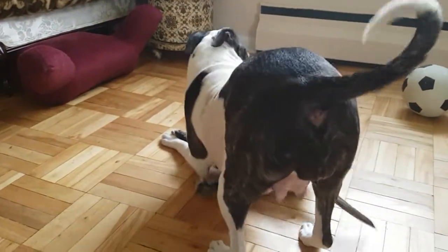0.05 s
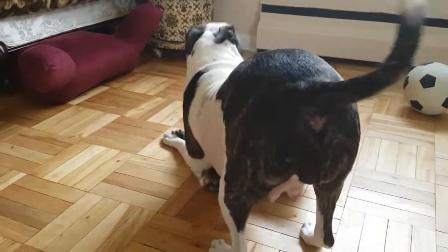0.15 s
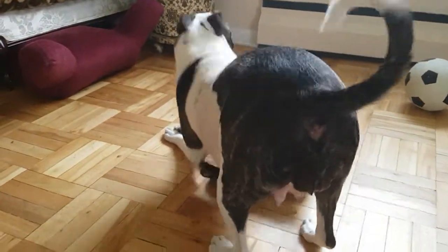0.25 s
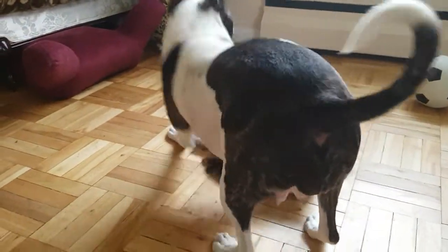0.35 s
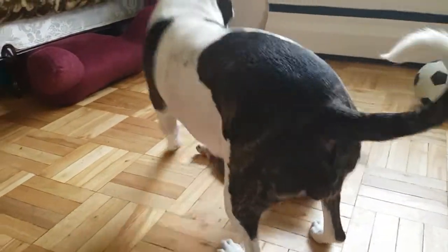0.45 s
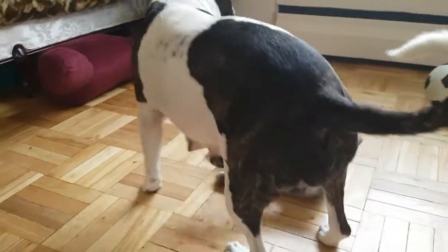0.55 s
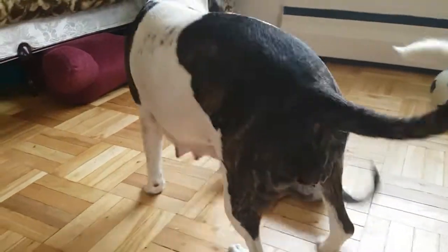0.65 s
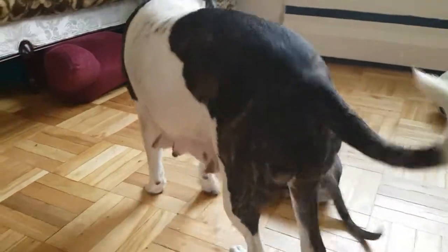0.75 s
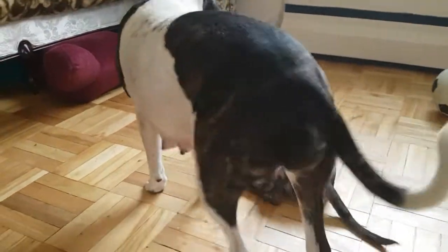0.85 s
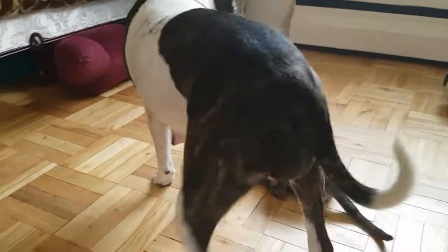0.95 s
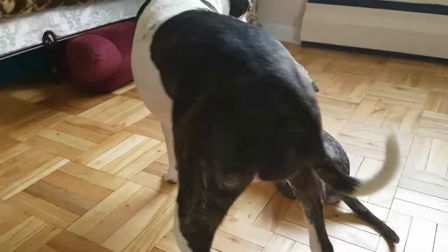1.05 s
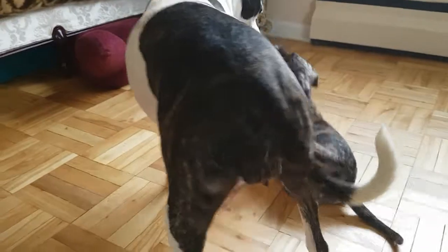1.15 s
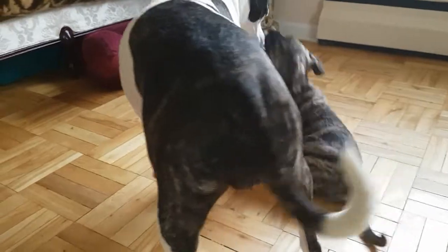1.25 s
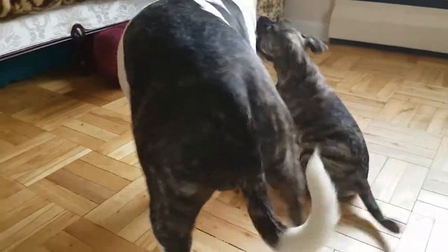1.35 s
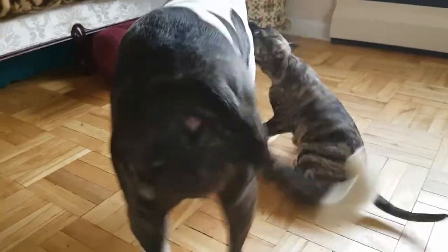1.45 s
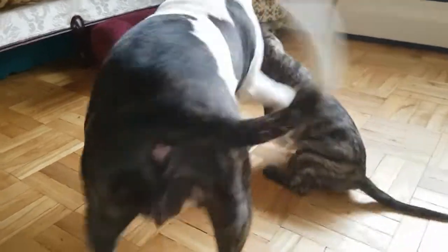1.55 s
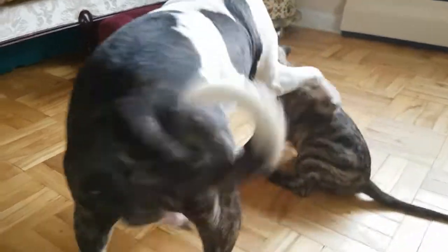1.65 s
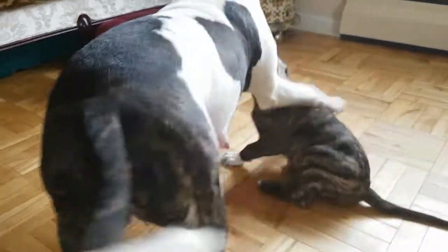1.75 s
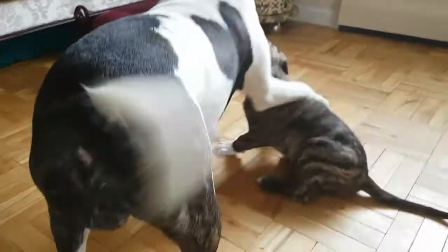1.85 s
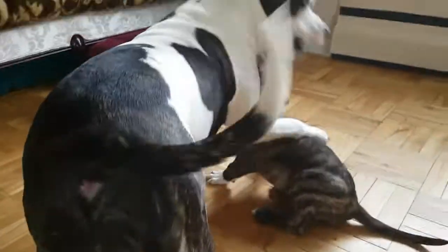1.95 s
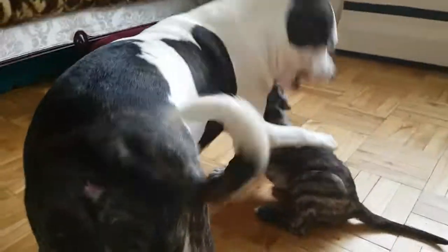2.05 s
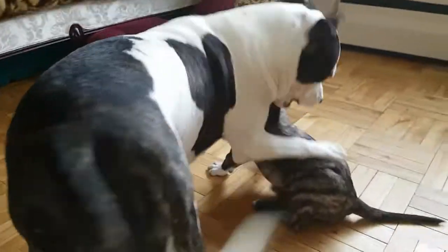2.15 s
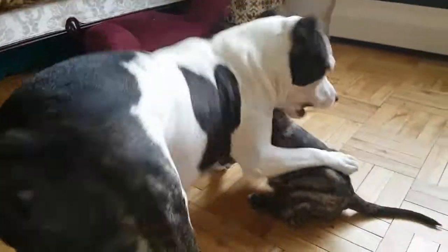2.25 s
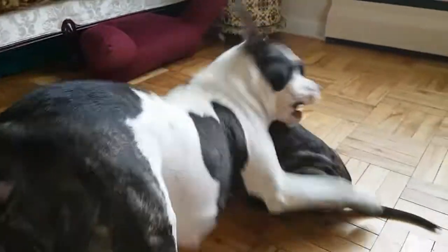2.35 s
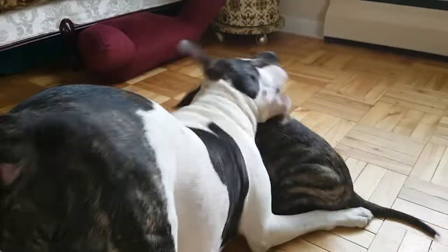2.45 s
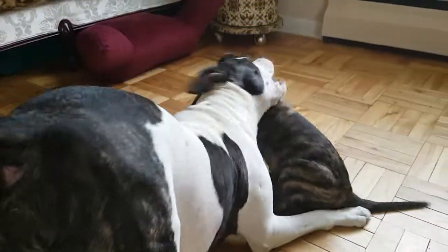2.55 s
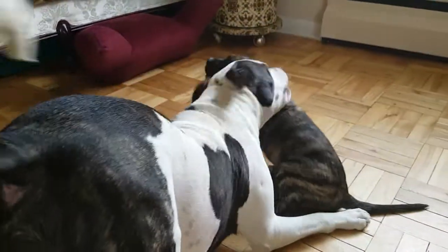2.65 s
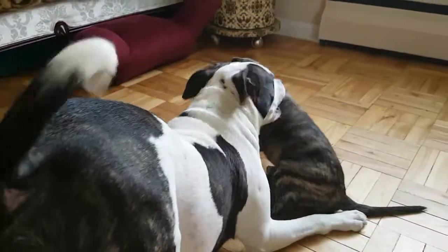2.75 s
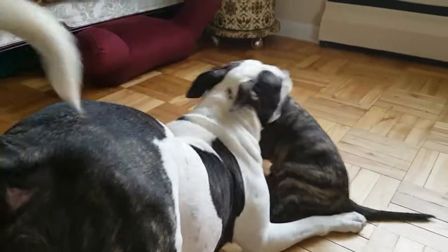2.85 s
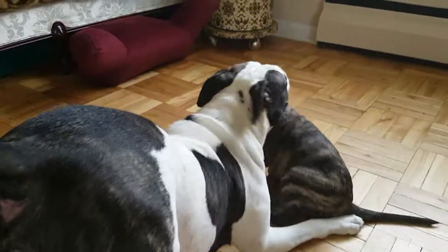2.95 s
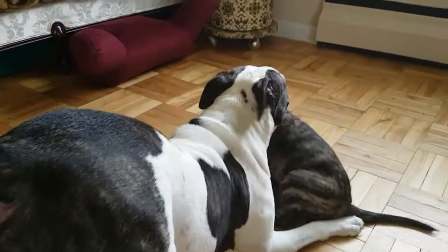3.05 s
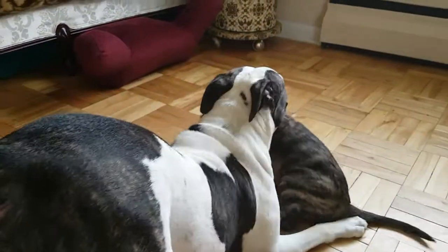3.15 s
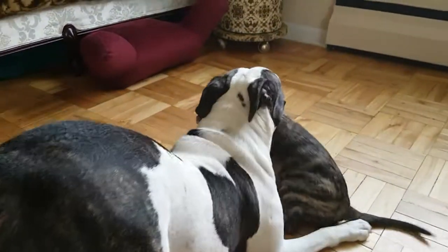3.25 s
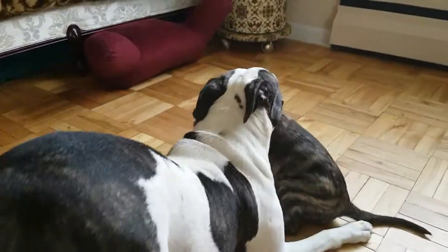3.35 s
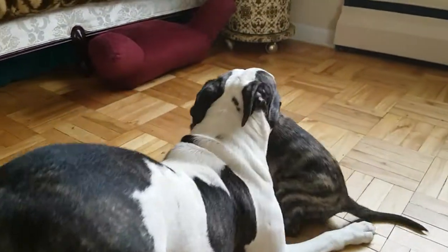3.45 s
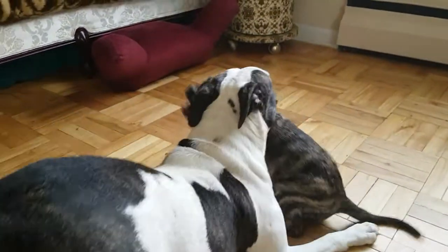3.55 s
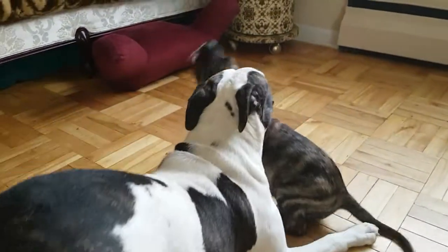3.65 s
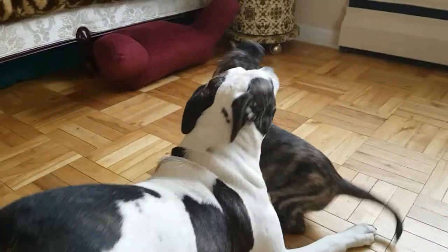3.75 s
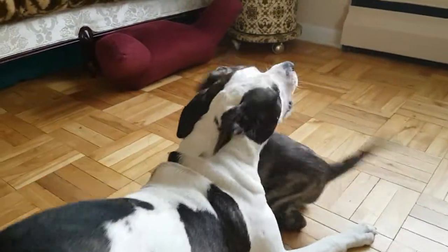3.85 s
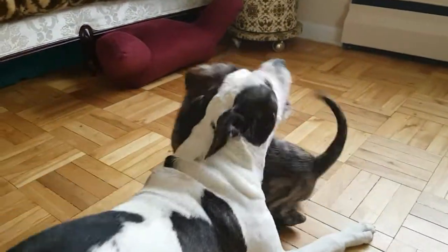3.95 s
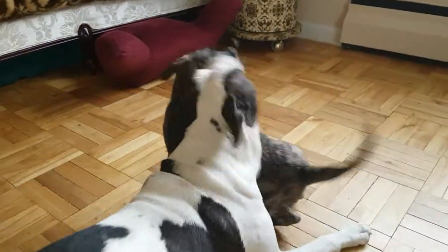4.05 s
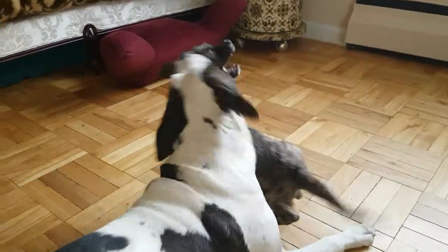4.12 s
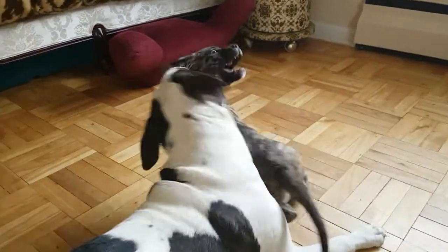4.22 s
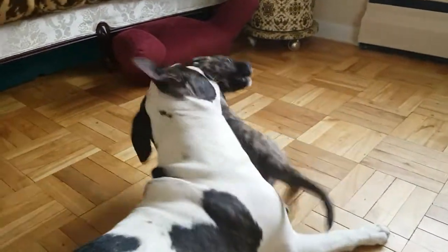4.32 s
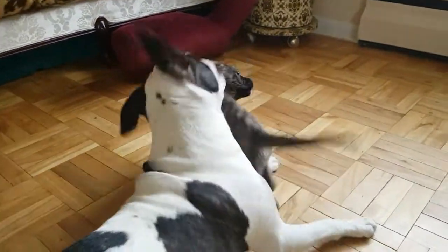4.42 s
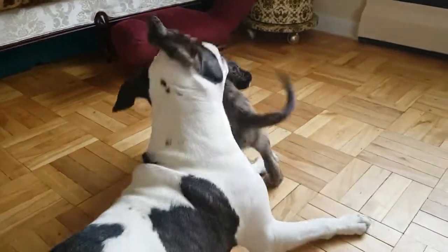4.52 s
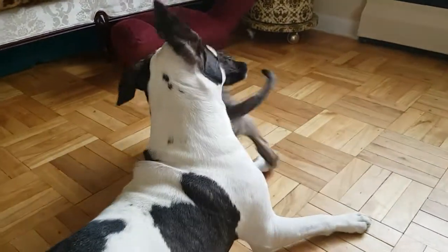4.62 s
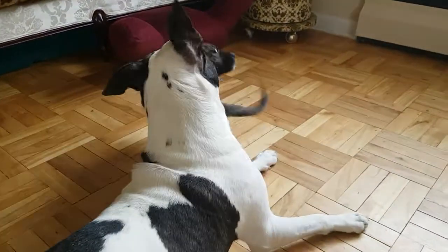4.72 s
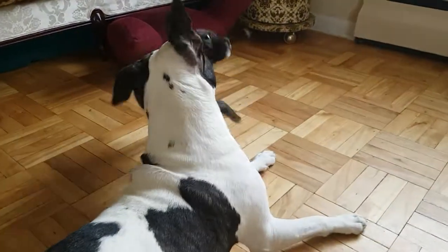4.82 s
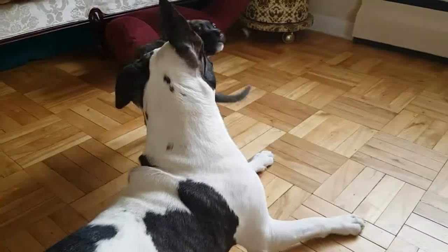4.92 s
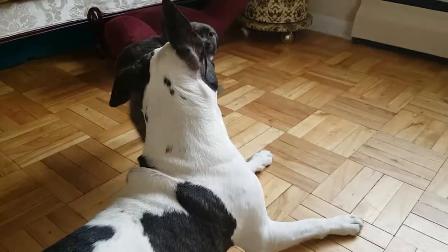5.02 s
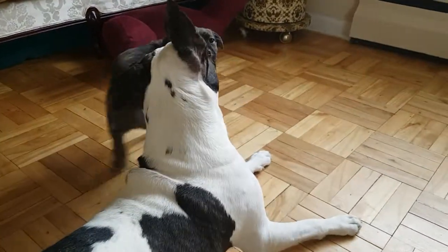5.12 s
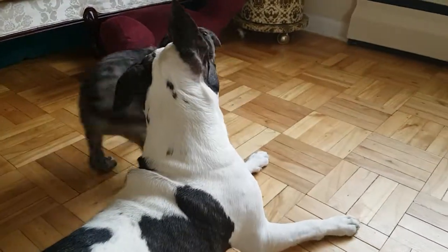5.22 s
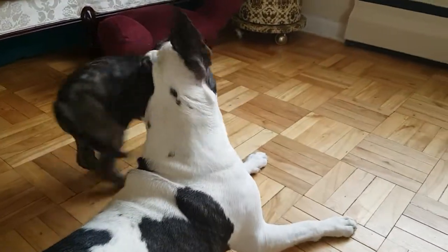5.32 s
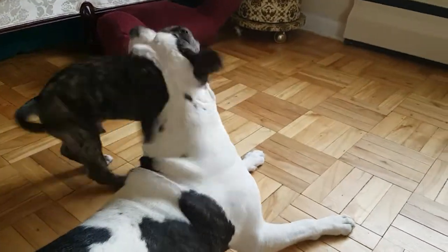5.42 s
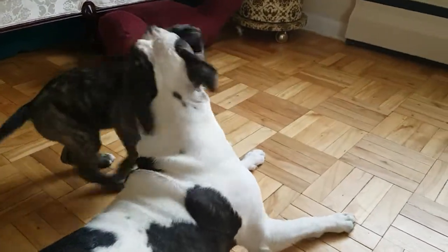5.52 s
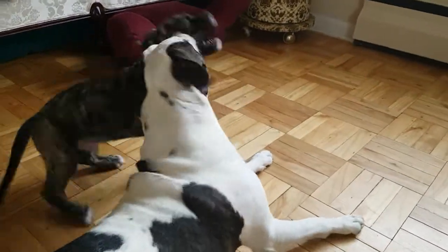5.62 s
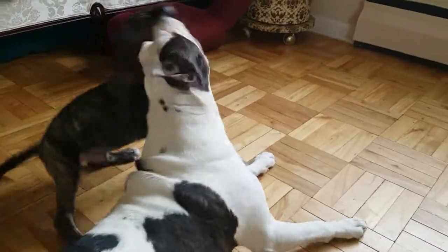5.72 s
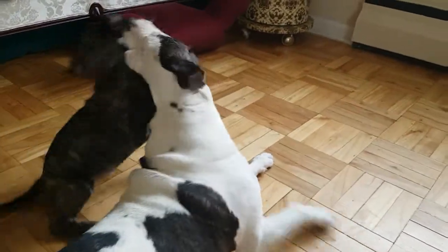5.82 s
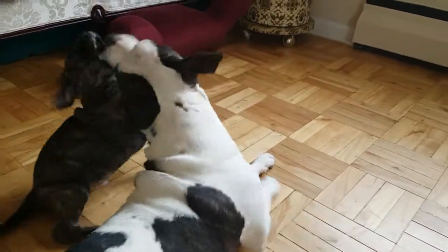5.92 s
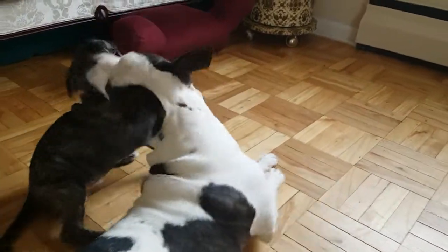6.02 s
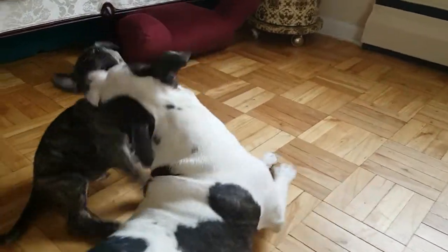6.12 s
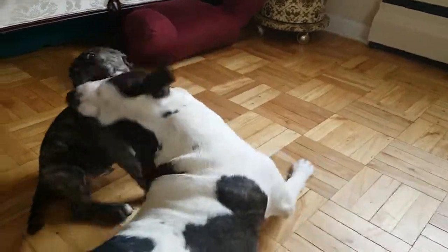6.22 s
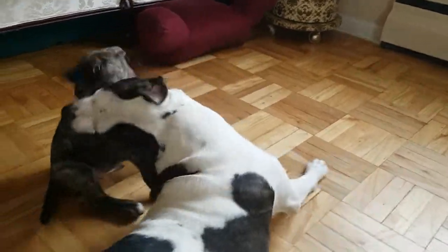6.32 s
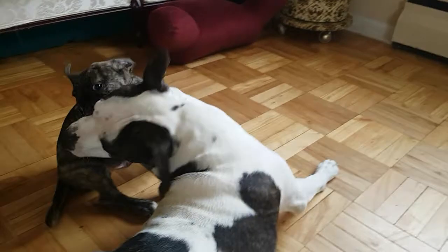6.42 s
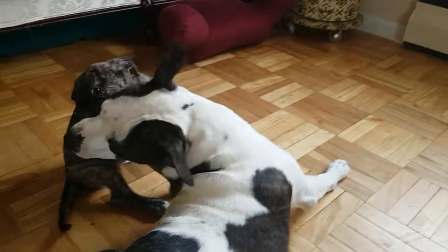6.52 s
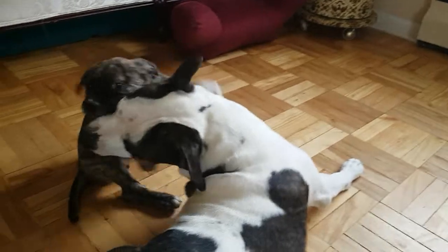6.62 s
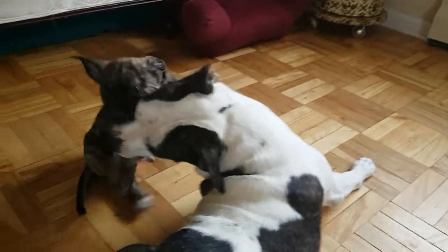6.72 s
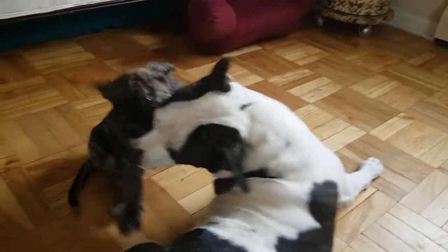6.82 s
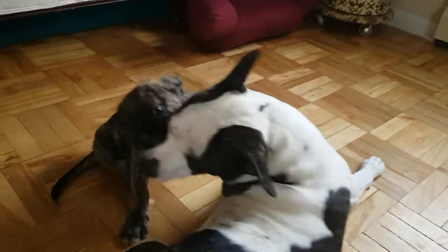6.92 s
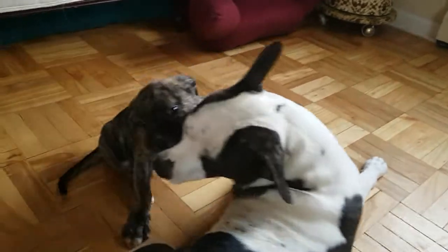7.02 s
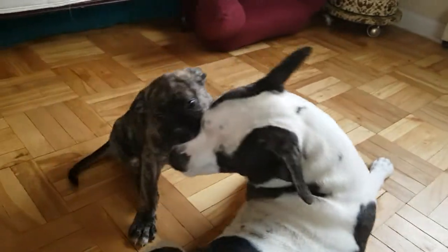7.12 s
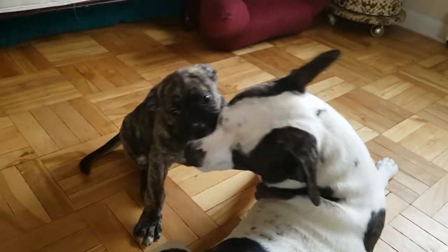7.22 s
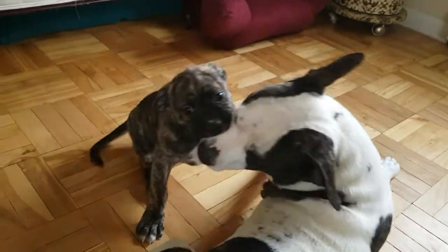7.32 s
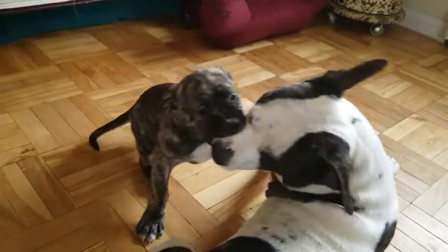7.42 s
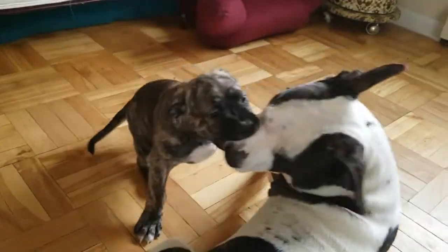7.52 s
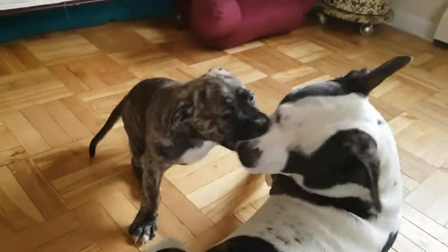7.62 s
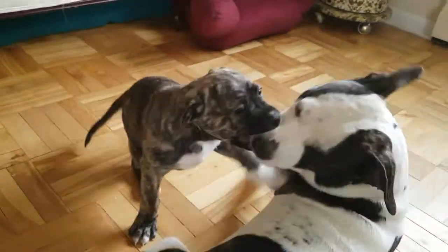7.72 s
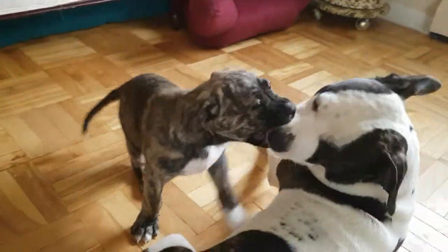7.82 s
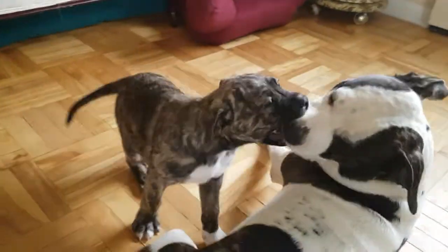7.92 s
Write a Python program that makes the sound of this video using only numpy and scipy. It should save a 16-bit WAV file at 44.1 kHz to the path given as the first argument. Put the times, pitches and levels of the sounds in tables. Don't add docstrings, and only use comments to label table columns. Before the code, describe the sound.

Two dogs wrestle on a parquet floor, claws ticking and scratching, paws knocking, one heavy bony thump early on, over a low appliance hum.

```python
import sys
import numpy as np
from scipy import signal
from scipy.io import wavfile

SR = 44100
rng = np.random.default_rng(int(sys.argv[2]) if len(sys.argv) > 2 else 0)


def dump(signal):
    limited = np.clip(np.atleast_2d(signal).T, -1, 1)
    pcm = np.round(limited * 32767).astype(np.int16)
    wavfile.write(sys.argv[1], SR, pcm)


def linear_from_db(decibels):
    return 10 ** (np.asarray(decibels, float) / 20)


N = 351477


def rms_one(x):
    return x / np.sqrt(np.mean(x ** 2) + 1e-20)


def peak_one(x):
    return x / np.abs(x).max()


def at_hz(points, hz):
    table_hz, value = np.array(points).T
    return np.interp(np.log(hz), np.log(table_hz), value)


def drift(rate_hz):
    points = rng.standard_normal(400)
    return np.interp(np.arange(N) / SR * rate_hz, np.arange(400), points)


def modes(hz, level, t60_s, t):
    decay = linear_from_db(-60 * t / t60_s[:, None])
    return (level[:, None] * np.sin(2 * np.pi * hz[:, None] * t) * decay).sum(axis=0)


def soft_start(t, stop_s):
    return (1 - np.exp(-t / stop_s)) ** 2


def fade_out(t):
    return np.cos(.5 * np.pi * t / t[-1])


def front(sound, t, fade_s):
    short = sound * np.exp(-t / fade_s)
    return short * np.sqrt((sound ** 2).sum() / (short ** 2).sum())


def add(out, s, sound, pan_db):
    port_lag = .7
    for side, part, sign in zip(out, np.broadcast_to(sound, (2, sound.shape[-1])), (1, -1)):
        i = round(s * SR + max(-sign * pan_db * port_lag, 0))
        side[i:i + len(part)] += part[:N - i] * linear_from_db(.5 * sign * pan_db)


# frequency in Hz, likeness 0-1.
LIKENESS = [(40, 1), (150, 0.88), (300, 0.8), (600, 0.69), (900, 0.45), (1400, 0), (4000, 0), (12000, 0)]


def two_ports(mid, side, hz):
    alike = np.clip(at_hz(LIKENESS, hz), 0, 1)
    return np.sqrt(1 + alike) * mid + np.sqrt(1 - alike) * side * [[1], [-1]]


def stereo_bands(size, gain, grain=1, first_band=0):
    edges_hz = 15 * 2 ** np.arange(0, 10.6, .5)
    out = 0
    white = rng.standard_normal((2, 2, size)) * grain
    for k, (low, high) in enumerate(zip(edges_hz[first_band:], edges_hz[first_band + 1:])):
        hz = np.sqrt(low * high)
        band = signal.butter(2, [low, high], "band", fs=SR, output="sos")
        mid, side = signal.sosfilt(band, white[k % 2])
        out = out + gain(hz) * two_ports(mid, side, hz)
    return out


# frequency in Hz, wander in Hz, level in dB, flutter in dB.
HUM = [(59, 3.94, -63, 7.5), (85, 3.93, -75.5, 0), (120.3, 2.53, -58.5, 1), (200, 1.908, -58.5, -2)]


def hum():
    out = 0
    for hz, wander_hz, level_db, flutter_db in HUM:
        phase = 2 * np.pi * np.cumsum(hz + wander_hz * drift(11.0)) / SR
        out = out + linear_from_db(level_db + 0.5 + flutter_db * drift(9.0)) * np.sin(phase)
    return out


# frequency in Hz, density in dB per Hz.
AIR = [(22, -1.5), (42, -16), (55, 6.5), (85, 1), (125, -11.5), (170, 4), (260, -13), (500, -12.5),
       (1000, -33), (2200, -52), (3500, -34.5), (8000, -46.5), (13000, -38.5)]


def air():
    level_db = -58
    noise = stereo_bands(N, lambda hz: linear_from_db(at_hz(AIR, hz) + 0.16 * drift(4.0)))
    return linear_from_db(level_db) * rms_one(noise)


def sliding(spectrum, s, level_db, grit_per_s, grit_db, patchy_db, first_band):
    catches = rng.random(N) < grit_per_s / SR
    grain = 1 + linear_from_db(grit_db) * rng.random(N) * catches
    together = drift(25.0)

    def gain(hz):
        return linear_from_db(at_hz(spectrum, hz) + patchy_db * (together + drift(39.0)))

    noise = stereo_bands(N, gain, grain, first_band)
    return linear_from_db(np.interp(np.arange(N) / SR, s, level_db)) * rms_one(noise)


# time in seconds, shuffle on the boards in dB, fur against fur in dB.
MOTION = [(0, -54.5, -66.5), (.85, -56.5, -70.5), (1.15, -64, -77), (1.35, -66, -71), (1.58, -52, -68),
          (1.95, -63.5, -74.5), (2.3, -53.5, -72), (2.55, -54, -61.5), (2.71, -63, -75),
          (2.858, -56.5, -70.5), (3.42, -65, -78.5), (4.04, -60.5, -71.5), (4.72, -59, -71.5),
          (4.97, -67, -81), (5.75, -59, -68.5), (6.26, -57.5, -68.5), (7.05, -67.5, -79), (7.97, -65, -75)]
# frequency in Hz, density in dB per Hz.
SHUFFLE = [(150, -66), (250, -1), (398, -2.5), (439, -7), (792, -1.5), (1480, -6), (1720, -2), (3940, -21),
           (5000, -26), (6500, -102), (11000, -120)]


def shuffle():
    s, shuffle_db, _ = np.transpose(MOTION)
    return sliding(SHUFFLE, s, shuffle_db, grit_per_s=250.0, grit_db=16.0, patchy_db=1.1, first_band=7)


# frequency in Hz, density in dB per Hz.
FUR = [(2000, 5), (3000, 4.5), (4500, 8.5), (6000, 1), (8000, 12.5), (10500, -11), (13000, 7),
       (16000, -40.5)]


def fur():
    s, _, fur_db = np.transpose(MOTION)
    return sliding(FUR, s, fur_db, grit_per_s=200.0, grit_db=10.0, patchy_db=.6, first_band=13)


def claws(rows, crack_at_40_db, crack_per_db, t60_s, low_hz, stop_s):
    out, t = np.zeros((3, N)), np.arange(1536) / SR
    bright = signal.butter(1, [low_hz, 7200], "band", fs=SR, output="sos")
    top = signal.butter(1, [9500, 12500], "band", fs=SR, output="sos")
    spread = np.array([-.9, -.5, -.2, 0, .15, .38, .7, 1, 1.3])
    signs = np.array([-1, 1, -1, 1, -1, 1, -1, 1, -1])
    for s, peak_db, hz, pan_db in rows:
        crack_db = crack_at_40_db + crack_per_db * (peak_db + 40)
        chance = rng.standard_normal((2, 9))
        octaves = spread + .03 * chance[0] * (spread != 0)
        level_db = np.where(octaves < 0, 9.0, -22.0) * octaves + 1.6 * chance[1]
        level_db = level_db - 3.6 * (octaves != 0)
        ring_hz = np.minimum(hz * 2 ** octaves, 15000)
        ring = modes(ring_hz, linear_from_db(level_db) * signs, t60_s * 2 ** (-.8 * np.abs(octaves)), t)
        ring = peak_one(ring * soft_start(t, stop_s))
        grit = rng.standard_normal((2, len(t))) * linear_from_db(-60 * t / 0.02)
        grit[:, 0] += 7.0
        crack = signal.sosfilt(bright, grit) + linear_from_db(-12.0) * signal.sosfilt(top, grit)
        sound = linear_from_db(peak_db - 0.5) * (ring + linear_from_db(crack_db + 16.0) * peak_one(crack))
        add(out[:2], s, sound, pan_db)
        snap = signal.sosfilt(bright, t == 0) + linear_from_db(-10.0) * signal.sosfilt(top, t == 0)
        heard = linear_from_db(peak_db) * (front(ring, t, fade_s=.0017) + linear_from_db(crack_db + 19.0) * peak_one(snap))
        add(out[2:], s, heard, 0)
    return out


# start in seconds, peak in dB, ring in Hz, left-right in dB.
SCRATCHES = [(.0506, -57, 1470, 0), (.194, -40, 1130, 1.5), (.5528, -32, 2170, -1), (.624, -46, 2040, 1),
             (.7846, -34, 1380, -2), (.9044, -51, 1160, -13), (1.4961, -27.5, 1850, -2.5),
             (1.5012, -34, 2060, 10), (4.1074, -45.5, 1480, 8), (5.5095, -50.5, 1310, -18),
             (6.5994, -70, 1570, -7), (7.4535, -65, 1190, 23)]


def scratches():
    return claws(SCRATCHES, crack_at_40_db=-8.5, crack_per_db=0.06, t60_s=0.011, low_hz=1300, stop_s=.00008)


# frequency in Hz, t60 in seconds.
ROOM_T60 = [(100, 0.19), (400, 0.42), (1500, 0.38), (5000, 0.4), (12000, 0.36)]
# frequency in Hz, level in dB.
ROOM_COLOUR = [(100, 3), (400, 2.15), (1300, 5.5), (2200, 9.5), (3100, 7.5), (4200, 8), (6000, 2),
               (12000, 2.5)]


def room(x):
    t = np.arange(SR // 2) / SR
    tail = stereo_bands(len(t), lambda hz: linear_from_db(at_hz(ROOM_COLOUR, hz) - 60 * t / at_hz(ROOM_T60, hz)))
    tail = tail * np.clip((t - .003) / 0.0033, 0, 1)
    tail = tail / np.sqrt((tail ** 2).sum() / 2)
    return signal.fftconvolve(x.mean(axis=0)[None], tail, axes=1)[:, :N]


def strokes(rows):
    out = np.zeros((2, N))
    for s, length_s, level_db, hz, octaves in rows:
        white = two_ports(*rng.standard_normal((2, 8192)), hz)
        edges_hz = np.minimum(hz * 2 ** (octaves * np.array([-.5, .5])), [14000, 20000])
        band = signal.butter(2, edges_hz, "band", fs=SR, output="sos")
        rub = rms_one(signal.sosfilt(band, white))
        progress = np.clip(np.arange(8192) / SR / length_s, 0, 1)
        add(out, s, linear_from_db(level_db) * rub * np.sin(np.pi * progress ** .7) ** .9, 0)
    return out


# start in seconds, length in seconds, level in dB, centre in Hz, width in octaves.
SKIDS = [(1.455, 0.058, -43, 1410, 0.48), (1.9, 0.095, -55.5, 1480, 0.69), (2.63, 0.054, -45, 920, 0.68),
         (2.7, 0.054, -54.5, 677, 0.19), (3.566, 0.05, -57, 1660, 0.79), (3.86, 0.12, -58.5, 770, 1.9),
         (4.046, 0.078, -55, 1600, 1.25), (4.622, 0.081, -57.5, 810, 1.2), (4.662, 0.068, -50.5, 430, 3.6),
         (4.796, 0.12, -63, 885, 0.61), (5.355, 0.027, -55.5, 1520, 0.17), (5.51, 0.058, -53.5, 1020, 2.9),
         (6.357, 0.051, -56, 1870, 1.4), (6.188, 0.046, -55, 1900, 1.9), (6.26, .09, -60.5, 1890, 0.93),
         (1.542, 0.035, -52, 1400, 2.3), (.19, 0.015, -50, 4500, 0.62), (2.818, 0.17, -71.5, 5500, 0.8),
         (6.601, 0.26, -75, 5340, 1.1)]


def skids():
    return strokes(SKIDS)


# start in seconds, peak in dB, ring in Hz, left-right in dB.
TAPS = [(.194, -31, 1800, 6), (.44, -44, 1430, 1), (.7554, -38, 1930, -4), (1.2874, -46, 1900, 4),
        (1.4561, -38, 1500, -2.1), (1.5706, -32.5, 2190, 0), (1.6918, -43.5, 1270, 5),
        (1.7202, -42, 1860, 8), (1.926, -41, 1480, 5), (2.0996, -41.5, 1250, 5), (2.1795, -42, 1280, 4),
        (2.1805, -45.5, 2430, 0), (2.2553, -43, 1570, 8), (2.4652, -15, 1460, 12), (2.4656, -21, 2186, 4),
        (2.4835, -30, 1520, 3), (2.649, -39, 970, -6), (2.913, -42, 2340, 1), (2.9602, -37.5, 1720, 4),
        (3.0788, -46, 1730, 9), (3.469, -41, 1830, 5), (3.5689, -37, 1560, 5), (3.6338, -39.5, 1670, 5),
        (4.0386, -40.5, 1720, -5), (4.7984, -39.5, 1290, 5), (5.252, -49, 990, -1), (5.3585, -41, 1410, 1),
        (5.584, -49, 2430, 0), (5.877, -46, 1010, 12), (6.2032, -42, 2060, 3), (6.2207, -39.5, 1200, -3),
        (6.223, -45, 2050, 7), (6.2466, -44, 1400, 8), (6.3566, -37, 1850, 8), (6.357, -48, 4400, 0),
        (6.369, -44, 2240, 3), (6.873, -59, 2190, 15), (6.8905, -40.5, 3970, 4), (6.894, -36, 2080, 2),
        (7.016, -62, 2250, 0.5), (7.7326, -51, 2280, 4), (7.8286, -49, 1380, 3)]


def taps():
    return claws(TAPS, crack_at_40_db=-32, crack_per_db=-0.15, t60_s=.03, low_hz=3200, stop_s=.00022)


# frequency in Hz, level in dB, t60 in seconds.
JOISTS = [(58.6, -4.5, 0.43), (86, -4.5, 0.5), (110.3, 3, 0.28), (128.2, 4.5, 0.21), (161, 1, 0.29),
          (210, -5.5, 0.067)]
# start in seconds, peak in dB.
THUDS = [(.2, -47), (2.464, -25), (2.515, -35), (2.635, -43.5), (3.93, -48.5), (4.04, -51.5), (4.67, -43),
         (4.699, -44), (6.069, -45.5), (6.19, -43), (6.291, -44)]


def thuds():
    out, t = np.zeros((2, N)), np.arange(14000) / SR
    hz, level_db, t60_s = np.transpose(JOISTS)
    for s, peak_db in THUDS:
        chance_db = 3.0 * rng.standard_normal(len(JOISTS))
        boom = modes(hz, linear_from_db(level_db + chance_db), t60_s, t) * soft_start(t, 0.0048)
        add(out, s, -linear_from_db(peak_db) * peak_one(boom) * fade_out(t), 0)
    return out


# frequency in Hz, level in dB.
BOARDS = [(260, -5.5), (310, -15), (385, 4.5), (470, 1), (620, 3), (840, 7), (1050, 4.5), (1300, -1),
          (1900, 9), (2600, 9.5)]


def knocks(rows, weight_db, give_s):
    out, t = np.zeros((3, N)), np.arange(7000) / SR
    board_hz = np.geomspace(260, 2600, 30)
    board_db = at_hz(BOARDS, board_hz)
    joist_hz, joist_db, joist_t60_s = np.transpose(JOISTS)
    for s, peak_db, hz, t60_s, pan_db in rows:
        chance = rng.standard_normal((3, len(board_hz)))
        slope_db = np.where(board_hz > hz, 10.5, 6.0)
        near_db = board_db - slope_db * np.abs(np.log2(board_hz / hz)) ** 1.07 + 2 * chance[0]
        signs = np.sign(chance[2] + 1.4)
        knock = modes(board_hz * (1 + 0.037 * chance[1]), linear_from_db(near_db) * signs,
                      t60_s * (board_hz / hz) ** -.6, t)
        knock = linear_from_db(peak_db) * peak_one(knock * soft_start(t, give_s))
        weight = modes(joist_hz, linear_from_db(joist_db + 2 * chance[2, :len(JOISTS)]), joist_t60_s, t)
        weight = peak_one(weight * soft_start(t, 0.003))
        weight = linear_from_db(peak_db + weight_db - 3.5) * weight * fade_out(t)
        add(out[:2], s, knock + weight, pan_db)
        add(out[2:], s, front(knock, t, fade_s=.0016) + weight, 0)
    return out


# start in seconds, peak in dB, knock in Hz, left-right in dB.
RAPS = [(0.201, -37, 330, 5), (.7635, -30.5, 1060, 3), (.7705, -25, 606, 0.5), (.783, -31, 826, 3),
        (.79, -35.5, 760, 0), (1.264, -49.5, 397, 1), (4.664, -41, 300, 1), (4.7, -43, 320, 0),
        (5.878, -45, 300, 3), (6.197, -41, 330, 1), (6.224, -43, 300, 0), (6.3, -40.5, 350, 0),
        (2.099, -44.5, 513, -3), (2.18, -43, 295, -1.1), (2.349, -36, 940, 1), (2.465, -11.5, 840, -2.5),
        (2.4788, -18, 380, 0), (2.4825, -22.5, 870, -1), (2.4891, -20, 416, -2), (2.507, -25, 520, 6),
        (2.633, -31, 840, -5), (2.679, -38, 714, -6), (3.478, -49.5, 754, -1.1), (4.801, -38, 805, -3),
        (6.204, -37.5, 624, 1), (6.286, -37.5, 300, 1), (6.352, -41.5, 400, -1), (6.892, -38, 735, 3),
        (7.944, -32.5, 400, -1)]


def raps():
    rows = [(s, peak_db, hz, 0.036, pan_db) for s, peak_db, hz, pan_db in RAPS]
    return knocks(rows, weight_db=-20.5, give_s=0.000486)


# start in seconds, peak in dB, knock in Hz, ring t60 in seconds.
STEPS = [(.202, -34.5, 484, 0.13), (0.552, -42, 1100, 0.29), (0.984, -47, 584, 0.041),
         (1.265, -42.5, 300, .033), (1.36, -45.5, 855, 0.027), (1.409, -42.5, 840, .015),
         (1.466, -43.5, 1170, 0.061), (1.544, -41, 585, 0.077), (1.963, -50, 1000, 0.51),
         (2.254, -45, 850, 0.099), (2.431, -27, 1020, 0.034), (2.948, -48, 346, 0.17),
         (3.949, -45, 576, .03), (4.092, -43, 440, 0.068), (4.686, -40.5, 380, 0.029),
         (5.358, -49.5, 565, 0.028), (5.509, -45, 880, 0.21), (5.875, -42, 480, 0.24),
         (6.029, -42.5, 600, 0.11), (6.185, -37, 450, 0.038)]


def steps():
    rows = [(s, peak_db, hz, t60_s, 0) for s, peak_db, hz, t60_s in STEPS]
    return knocks(rows, weight_db=-6.5, give_s=0.0014)


# start in seconds, length in seconds, level in dB, width in octaves.
SWISHES = [(.32, .12, -70.5, .7), (0.546, 0.079, -53.5, 7.1), (0.687, 0.069, -60.5, 1.3),
           (0.75, .09, -75, 1.6), (0.877, .059, -65, .9), (0.981, 0.044, -56, 7.6),
           (1.355, 0.078, -72, 1.1), (1.515, 0.11, -74, 2.1), (1.553, 0.047, -50, 3),
           (1.716, 0.085, -69.5, 1.2), (2.272, .14, -51.5, 11), (4.46, .053, -71, .79),
           (4.548, .045, -68.5, 0.55), (4.663, 0.069, -61, 5.2), (5.506, 0.039, -62, 0.53),
           (5.936, 0.088, -66, 6.6), (6.167, 0.087, -69, 3.6), (6.244, 0.084, -66, 5),
           (7.563, .12, -74.5, 0.68)]


def swishes():
    centre_hz = 11600
    return strokes([(s, length_s, level_db, centre_hz, octaves) for s, length_s, level_db, octaves in SWISHES])


# start in seconds, peak in dB, ring in Hz, left-right in dB.
TICKS = [(.476, -47, 1420, 1), (.7607, -25.5, 1964, 2), (.7644, -29.5, 1670, -3.5), (.7927, -33, 1550, 4),
         (.9852, -39, 1860, 11), (1.363, -48, 1750, 11), (1.486, -35.5, 1620, 23), (1.5682, -25, 2150, 2),
         (1.882, -49, 1090, -3), (2.2744, -34.5, 2000, -3.5), (2.3508, -34.5, 2100, 3),
         (2.435, -22, 4100, -6.5), (4.2015, -45.5, 4070, 2), (4.4458, -46.5, 2180, -2),
         (4.5365, -55, 1320, 3), (4.6596, -33, 2110, 7.5), (5.25, -45, 1750, 5), (5.5349, -41, 1400, -4.5),
         (5.9419, -47.5, 1940, 6), (6.1842, -34.5, 2040, 6), (6.2881, -43, 1580, 5.5),
         (6.8903, -33.5, 2010, -1), (7.541, -52.5, 1910, 5)]


def ticks():
    return claws(TICKS, crack_at_40_db=-20, crack_per_db=0.12, t60_s=.03, low_hz=3200, stop_s=.00008)


def scene():
    claw = scratches() + taps() + ticks()
    knock = raps() + steps()
    rub = skids() + swishes()
    echo = room(linear_from_db(-5.0) * claw[2] + linear_from_db(-0.5) * knock[2] + linear_from_db(-4.5) * rub)
    dogs = claw[:2] + knock[:2] + rub + thuds() + shuffle() + fur()
    return dogs + echo + air() + hum()


def roll_off(x):
    return signal.sosfilt(signal.butter(12, 16650, fs=SR, output="sos"), x)


def record(dry):
    port_hz, port_width_hz, port_db, cutoff_hz = 10040, 700, -6, 15900
    r = np.exp(-np.pi * port_width_hz / SR)
    poles = [1, -2 * r * np.cos(2 * np.pi * port_hz / SR), r * r]
    cavity = signal.lfilter([(1 - r * r) / 2, 0, (r * r - 1) / 2], poles, dry)
    low_pass = signal.cheby2(10, 40, cutoff_hz + 700, fs=SR, output="sos")
    return roll_off(signal.sosfilt(low_pass, dry + linear_from_db(port_db) * cavity))


dry = scene()
out = record(dry)
dump(out)
```